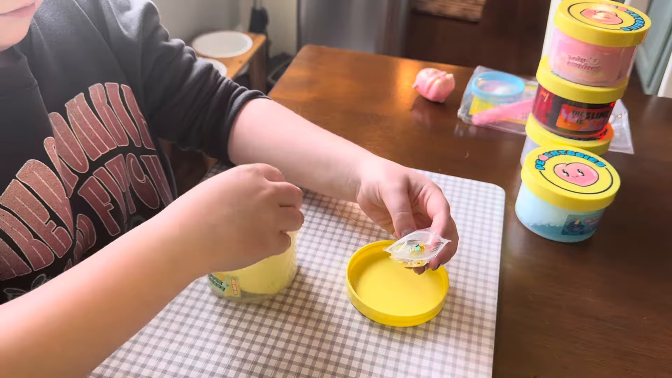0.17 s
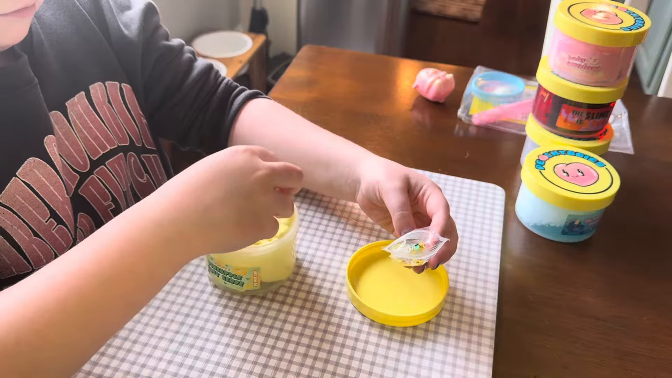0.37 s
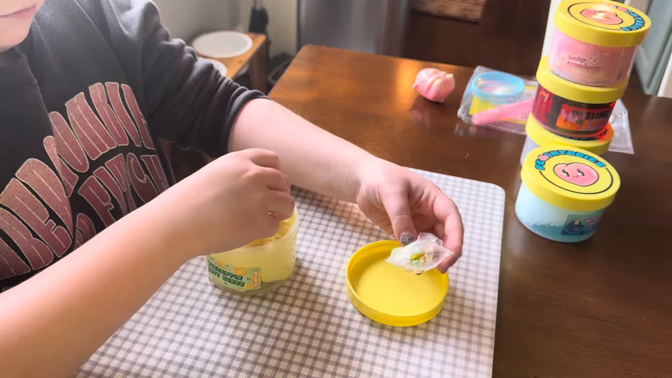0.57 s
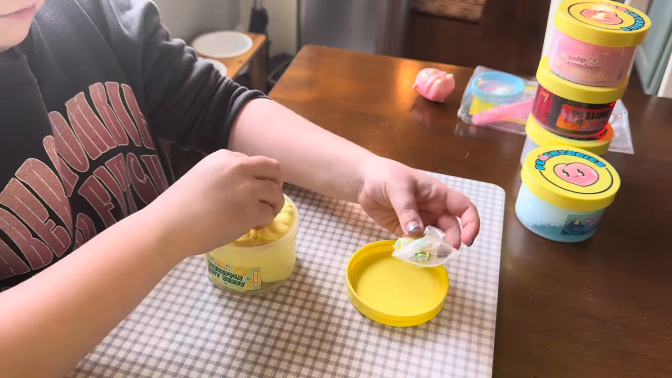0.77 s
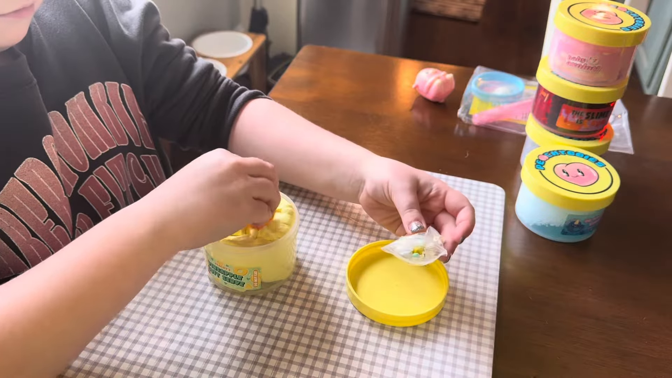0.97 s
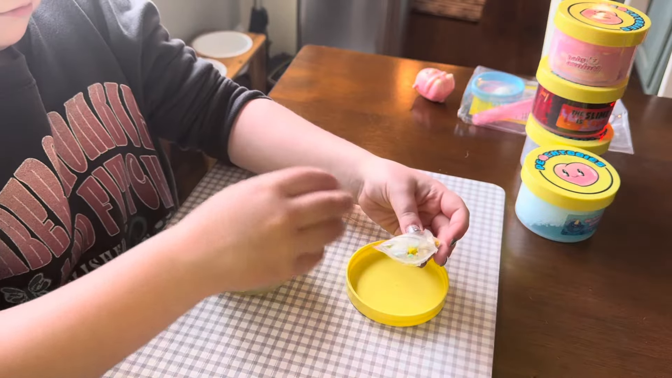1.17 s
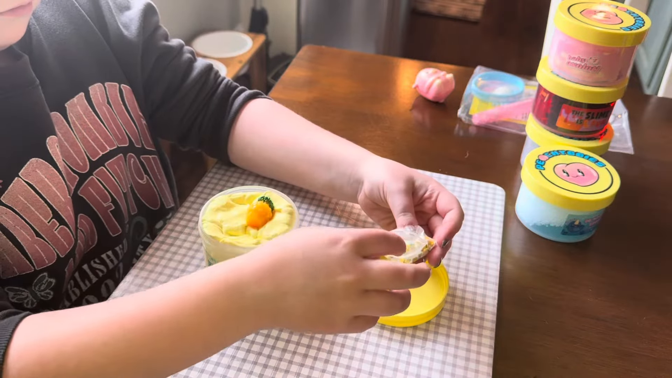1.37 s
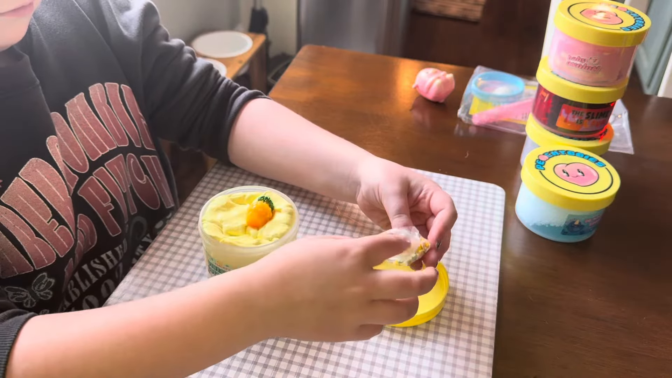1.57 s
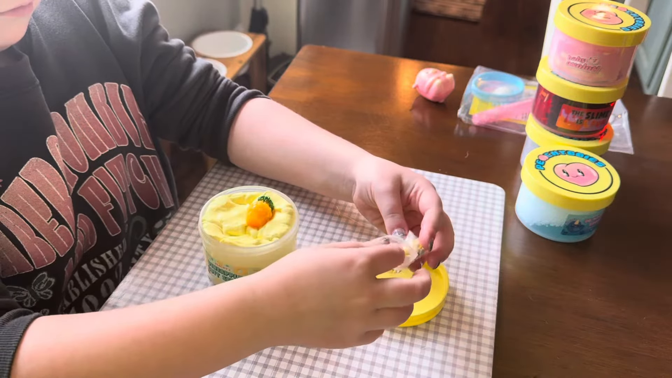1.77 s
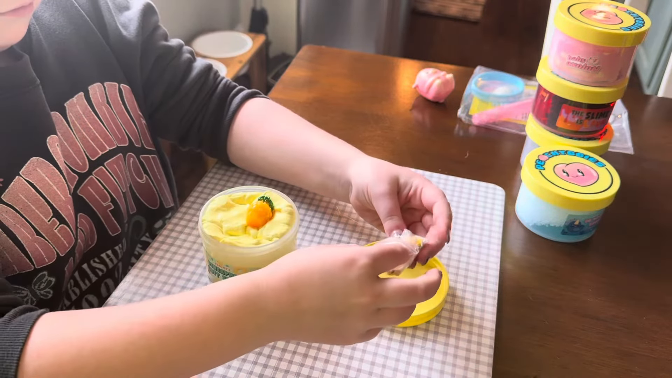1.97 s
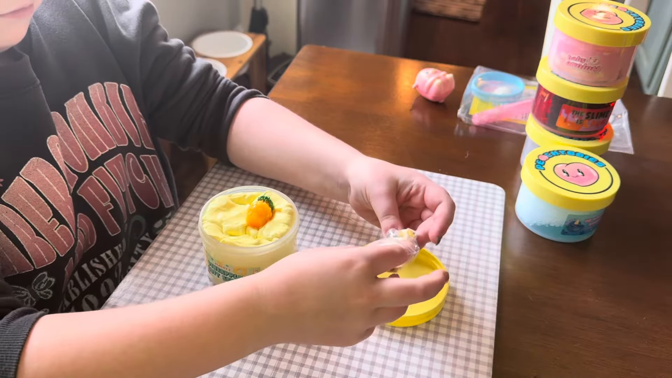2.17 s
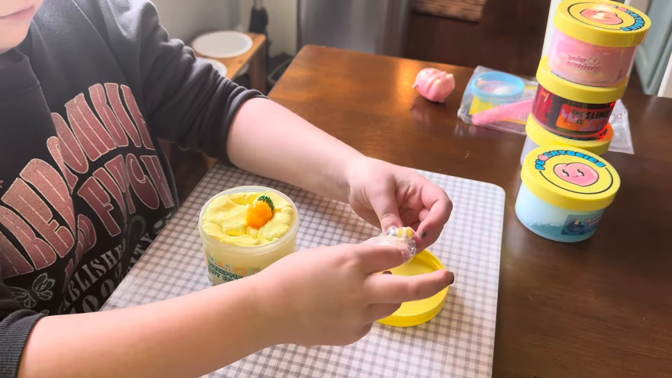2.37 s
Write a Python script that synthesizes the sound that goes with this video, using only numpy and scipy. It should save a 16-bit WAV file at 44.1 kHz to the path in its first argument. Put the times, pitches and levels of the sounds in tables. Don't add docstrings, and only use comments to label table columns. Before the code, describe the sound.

Close-up crackling of a small plastic bag, sparse at first and then dense, preceded by a quick knocking bounce of a trinket on wood; faint hiss, low hum and dull footfalls in a quiet room.

```python
import sys
import numpy as np
from scipy import signal
from scipy.fft import rfft, irfft
from scipy.io import wavfile
from scipy.ndimage import uniform_filter1d

SR = 44100
rng = np.random.default_rng(int(sys.argv[2]) if len(sys.argv) > 2 else 0)


def ratio(d):
    e = np.asarray(d, float) / 20
    return 10 ** e


def unload_wav(signal):
    wavfile.write(
        sys.argv[1],
        SR,
        np.round(np.clip(np.atleast_2d(signal).T, -1, 1) * 32767).astype(np.int16),
    )


N = 110250

# (pitch [Hz], level [dB])
AIR_TONE = [(28, -23), (55, -9), (140, -1.5), (270, -4), (516, -9), (863, -22), (3700, -41), (9000, -42.5),
            (16000, -66)]
# (pitch [Hz], likeness [1 = same])
LIKENESS = [(60, .99), (300, .75), (800, .15), (5500, .15), (7500, .88), (9500, .98), (16000, .98)]
# (pitch [Hz], time [s])
ECHO_T60 = [(60, 0.57), (250, 0.18), (1000, 0.64), (3000, 0.46), (7000, 0.44), (14000, 0.1)]

# (time [s], level [dB], floor pitch [Hz], air puff level [dB], floor ring t60 [s])
STEPS = [(0.231, -46, 63, -88, 0.23), (0.298, -31.5, 55, -43, 0.24), (0.431, -41.5, 71, -55, 0.25),
         (0.8698, -44.5, 71.6, -47, 0.17), (.893, -30.5, 63.6, -57, .16), (0.946, -51.5, 67, -54, .1),
         (.969, -36, 62.3, -56, 0.13), (0.985, -40.5, 64, -65.5, 0.048), (1.069, -63, 66, -67, 0.11),
         (1.33, -54, 50, -80, 0.086), (1.376, -45, 61, -61.5, 0.19), (1.424, -47, 58, -78, 0.34),
         (1.502, -44.5, 67.8, -65, .2), (1.548, -50, 62.7, -59, 0.25), (1.909, -51.5, 56.5, -75, 0.13),
         (2.014, -62, 63.6, -48.5, .1), (2.026, -41.5, 64.5, -50, 0.19), (2.036, -47, 220, -57, 0.073),
         (2.058, -49, 271, -79, 0.19), (2.08, -42.5, 62, -71, .1), (2.099, -45.5, 61, -75, 0.26),
         (2.49, -66, 62, -47.5, 0.22)]
# (pitch [Hz], level [dB per Hz])
PUFF_TONE = [(120, -31), (180, -0.5), (360, -8.5), (750, -14.5), (1100, -23), (2800, -26), (5000, -35),
             (6500, -52)]

# (time [s], knock [dB], table thump [dB], bright tick [dB], deepest table note [dB])
BOUNCES = [
    (0.2088, -20.5, -14.5, -24, 4),
    (0.253, -22, -18, -53, -9),
    (0.2874, -23.5, -22, -44.5, -18),
    (0.3178, -26, -20, -55, -30),
    (.340, -29.5, -21.5, -41.5, -19),
    (0.3575, -32.5, -28, -57, 0),
]
# (pitch [Hz], level [dB], t60 [s])
TABLE_NOTES = [(129.7, -3.5, 0.25), (209, -5, 0.048), (279, 5, 0.033), (348, -8, 0.05), (400, -13, 0.036),
               (557, -17.5, 0.08), (691, -11.5, 0.057), (812, -7.5, 0.031), (953, -16, 0.071),
               (1350, -3.5, 0.029), (1558, -10, 0.052), (2180, -14, 0.05), (2400, -9, 0.022)]
# (pitch [Hz], level [dB per Hz])
KNOCK_TONE = [(180, -27), (320, -5), (900, 1.5), (1700, -10), (2800, -10), (4300, -18.5), (7700, -28),
              (16000, -38)]

# (time [s], pitch [Hz], level [dB])
SQUEAK = [
    (.5, 3940, -95),
    (0.551, 3900, -81),
    (0.622, 3790, -74),
    (0.722, 3850, -78),
    (.78, 3630, -78),
    (.84, 3470, -82),
    (.9, 3450, -88),
]

# (time [s], peak [dB], low part [dB], low part pitch [Hz])
SNAPS = [(0.4532, -49.5, 3.5, 6000), (0.781, -62.5, 3, 3900), (1.1014, -29, -11, 4000),
         (1.4214, -55, -35, 1230), (1.4476, -57, -1, 2070), (1.493, -58.5, -24, 1150),
         (1.5559, -40, -1, 3900), (1.5608, -20.5, -17, 3850), (1.5684, -26.5, -2.5, 4120),
         (1.5852, -38.5, -4.5, 2000), (1.5968, -41, -2, 1250), (1.6344, -28.5, -8, 1110),
         (1.741, -30.5, -9, 2980)]
# (time [s], peak [dB], low part [dB], low part pitch [Hz])
CRINKLES = [(1.9198, -42, -1, 1120), (1.9325, -42, -7, 2510), (1.9419, -36.5, -18, 2640),
            (1.9605, -25, -24, 694), (1.9712, -39.5, -2, 2620), (1.9838, -28, -18, 910),
            (1.991, -47.5, 3, 940), (2.03, -32.5, -4, 1840), (2.0444, -42.5, -33, 745),
            (2.1212, -36.5, -4.5, 2860), (2.165, -49.5, -4, 2530), (2.1935, -35, -44, 800),
            (2.3335, -53.5, 10.5, 2320), (2.3722, -59.5, 0, 2450), (2.378, -41.5, 3.5, 2450),
            (2.3862, -50, 9.5, 2710), (2.3994, -45, 6, 970), (2.4346, -28.5, -19.5, 2680),
            (2.4793, -56, 9, 3580), (2.4934, -49, 4, 850)]
# (time [s], peak [dB], low part [dB], low part pitch [Hz])
MORE_CRACKLES = [(.548, -57, 0, 4100), (.661, -70.5, 7, 3850), (1.3236, -56, -17, 2000), (1.611, -40, -8, 1500),
                 (1.7108, -51, 5, 1480), (1.8261, -59, -4, 900), (1.8544, -47, -5, 1490), (1.87, -39, -18, 2500),
                 (1.873, -50, -4, 2500), (1.886, -39, -13, 2500), (1.891, -59.5, 5, 2000), (1.898, -52.5, 1, 2500),
                 (1.9229, -37, -6.5, 2600), (1.9368, -52, 11, 2720), (2.0385, -50, 6.5, 2400),
                 (2.171, -54, -20, 2500), (2.178, -61.5, 10, 2500), (0.158, -40, -8, 3700), (2.358, -49, -20, 2500),
                 (2.3159, -59, 5, 2400), (2.343, -66, 14, 2550)]
SHEEN_DB = [-21, -9, -4, 5, 3, 0.1, 3, 5, -4, 4, 13.5, -5, 1, 1, -1, 2, -2, 2, 7, -1, 9.5, 10, 6, 11.5, 5,
            -1, -1, 0, -15, -14, 4.5, -3, 4]
# (pitch [Hz], level [dB per Hz])
FILM_TONE = [(880, -36), (1500, -17.5), (3000, -32.5), (4000, -12), (5500, -23.5), (7600, -5.5),
             (11500, -11.5), (16000, -8.5)]
# (pitch [Hz], level [dB per Hz])
SEND_TONE = [(1500, -14), (3500, 0), (6000, -2.5), (8500, -1.5), (13000, 3)]
# (middle [s], half length [s], level [dB])
RUSTLE = [(0.142, 0.03, -68), (0.16, 0.014, -53.5), (0.26, 0.19, -70.5), (0.541, 0.063, -65),
          (0.662, 0.04, -73), (0.767, 0.1, -74.5), (1.152, 0.18, -78), (1.325, 0.053, -73),
          (1.409, 0.059, -73.5), (1.518, 0.047, -64), (1.603, 0.054, -57.5), (1.723, 0.14, -60.5),
          (1.882, 0.051, -58), (1.975, 0.043, -53), (2.03, 0.3, -72), (2.15, 0.17, -68), (2.335, 0.13, -71),
          (2.397, 0.03, -53.5)]
# (pitch [Hz], level [dB per Hz])
RUSTLE_TONE = [(400, -24.5), (700, -0.5), (1300, -3), (3700, -3.5), (5500, -11), (8500, -5.5),
               (12300, -8.5), (16000, -5)]

# (pitch [Hz], left ahead by [radians])
PORT_PHASE = [(1500, 0), (4200, -2), (5400, -1.5), (7300, 0), (9600, 3.14), (12200, 6.28), (15800, 9.42),
              (17000, 11)]
# (pitch [Hz], left minus right [dB])
PORT_LEVEL = [(100, -.8), (1500, -1.5), (5500, -4.5), (8000, 0)]


def evened(x):
    return x / np.sqrt(np.mean(x ** 2) + 1e-20)


def read(points, hz):
    f, value = np.transpose(points)
    return np.interp(np.log(hz + 1), np.log(f + 1), value)


def add(mix, s, sound):
    part = mix[round(s * SR):][:len(sound)]
    part += sound[:len(part)]


def alike(same, a, b):
    return same * a + np.sqrt(1 - same ** 2) * b


def colour(x, points):
    hz = abs(np.fft.fftfreq(4096, 1 / SR))
    log_gain = np.log(ratio(np.maximum(read(points, hz), -70)))
    taps = np.fft.ifft(np.exp(log_gain - 1j * signal.hilbert(log_gain).imag)).real
    if abs(taps[-400:]).sum() > abs(taps[:400]).sum():
        taps = np.roll(taps[::-1], 1)
    taps = taps[:2048]
    return signal.oaconvolve(x, taps / np.linalg.norm(taps))[:len(x)]


def burst(rise_s, t60, noise):
    t = np.arange(len(noise)) / SR
    fall = ratio(-60 * np.maximum(t - rise_s, 0) / t60)
    return noise * np.minimum(t / rise_s, 1) ** 2 * fall


def room(x):
    dull_db_per_khz = -0.2
    echoes = rng.choice([-1., 1.], (2, SR)) * (rng.random((2, SR)) < 0.4)
    echoes[:, :round(0.004 * SR)] = 0
    hz, t, z = signal.stft(echoes, SR, nperseg=256)
    hz = hz[:, None]
    z = np.array([z[0], alike(read(LIKENESS, hz), z[0], z[1])])
    fade = ratio(-60 * t / read(ECHO_T60, hz) + dull_db_per_khz * hz / 1000)
    tail = signal.istft(z * fade, SR, nperseg=256)[1]
    return signal.fftconvolve(x[None], tail / np.linalg.norm(tail[0]), axes=1)[:, :N]


def air():
    air_db, patch_db, hum_hz, hum_db = -60, 0.31, 513, -71
    frames, hz = N // 256 + 5, np.fft.rfftfreq(1024, 1 / SR)[:, None]
    a, b, c, d, patches = rng.standard_normal((frames, 513, 5)).T
    patches = uniform_filter1d(patches, size=8, axis=0)
    patches = evened(uniform_filter1d(patches, size=14, axis=1))
    left = a + 1j * b
    z = np.array([left, alike(read(LIKENESS, hz), left, c + 1j * d)])
    z *= ratio(read(AIR_TONE, hz) + patch_db * patches)
    hiss = signal.istft(z, nperseg=1024, noverlap=768)[1][:, :N]
    hum = np.sin(2 * np.pi * hum_hz * np.arange(N) / SR)
    return ratio(air_db) * evened(hiss) + ratio(hum_db) * hum


def steps():
    rise_s = 0.0087
    floor, puff, t = np.zeros(N), np.zeros(N), np.arange(SR // 4) / SR
    noises = rng.standard_normal((len(STEPS), SR // 4))
    for (s, db, hz, puff_db, t60), noise in zip(STEPS, noises):
        wave = np.cos(2 * np.pi * hz * (t - rise_s))
        add(floor, s, ratio(db) * burst(rise_s, t60, wave))
        add(puff, s, ratio(puff_db) * burst(0.0057, 0.063, noise))
    return floor, colour(puff, PUFF_TONE)


def table_ring():
    t, sides = np.arange(SR // 2) / SR, np.array([[1], [-1]])
    ring = []
    for k, (hz, db, t60) in enumerate(TABLE_NOTES):
        skew = sides * (-1) ** k * min((hz / 800) ** 2, 1.2)
        ring.append(ratio(db - 60 * t / t60) * np.sin(2 * np.pi * hz * t + skew))
    return np.array(ring) * np.minimum(t / 0.0021, 1)


def trinket():
    table_db, knock_same = -8, 0.88
    spot_db = 4.5
    tick, knock, push = np.zeros(N), np.zeros((2, N)), np.zeros((len(TABLE_NOTES), N))
    noises = rng.standard_normal((len(BOUNCES), 3, 800))
    for (s, db, thump_db, tick_db, deep_db), noise in zip(BOUNCES, noises):
        right = alike(knock_same, noise[0], noise[2])
        add(knock[0], s, ratio(db) * burst(0.0011, 0.021, noise[0]))
        add(knock[1], s, ratio(db) * burst(0.0005, 0.013, right))
        add(tick, s, ratio(tick_db) * burst(0.0021, 0.0063, noise[1]))
        note_db = np.r_[deep_db, spot_db * noise[1, 1 - len(TABLE_NOTES):]]
        push[:, round((s + 0.005) * SR)] = ratio(thump_db + note_db)
    thump = signal.fftconvolve(push[:, None], table_ring(), axes=2).sum(0)[:, :N]
    knock = np.array([colour(k, KNOCK_TONE) for k in knock])
    return knock + colour(tick, FILM_TONE) + ratio(table_db) * thump


def squeak():
    width_hz = 530
    s, hz, db = np.transpose(SQUEAK)
    t, r = np.arange(N) / SR, np.exp(-np.pi * width_hz / SR)
    noise = rng.standard_normal(N) + 1j * rng.standard_normal(N)
    fuzz = signal.lfilter([1], [1, -2 * r, r * r], noise)
    turns = np.cumsum(np.interp(t, s, hz)) / SR
    tone = (fuzz * np.exp(2j * np.pi * turns)).real
    return ratio(np.interp(t, s, db, -140, -140)) * evened(tone)


def rustle():
    grains_per_s, t, level = 2300, np.arange(N) / SR, np.zeros(N)
    for s, half_s, db in RUSTLE:
        level += ratio(db) * np.exp(-2 * ((t - s) / half_s) ** 2)
    grains = rng.standard_normal(N) * (rng.random(N) < grains_per_s / SR)
    grains *= ratio(0.93 * np.minimum(rng.exponential(1, N), 3))
    grains = evened(grains) + rng.standard_normal(N)
    return level * evened(colour(grains, RUSTLE_TONE))


def bag():
    sheen_hz, low_db_all, spread = 10000, -1.5, 1.16
    crack, low, send = np.zeros((2, N)), np.zeros(N), np.zeros(N)
    rows = list(SNAPS) + list(CRINKLES) + list(MORE_CRACKLES)
    sheens = list(SHEEN_DB) + [0] * len(MORE_CRACKLES)
    treble = signal.butter(3, sheen_hz, "high", fs=SR)
    noises = rng.standard_normal((len(rows), 2, 900))
    for (s, db, low_db, hz), sheen_db, noise in zip(rows, sheens, noises):
        snap = ratio(db) * burst(0.0006, 0.0045, noise[0])
        snap = snap + (ratio(sheen_db) - 1) * signal.filtfilt(*treble, snap)
        add(send, s, np.linalg.norm(snap, keepdims=True))
        side = int(np.sign(noise[0, -1]))
        add(crack[0], s, snap)
        add(crack[1], s, 0.85 * snap + 0.4 * np.roll(snap, side))
        band = signal.butter(1, [hz / spread, hz * spread], "band", fs=SR)
        body = evened(signal.lfilter(*band, noise[1]))
        add(low, s + 0.0008, ratio(db + low_db + low_db_all) * burst(0.0007, 0.0079, body))
    near = low + rustle()
    return np.array([colour(c, FILM_TONE) for c in crack]) + near, colour(send, SEND_TONE) + near


def scene():
    drop, (film, send), (floor, puff) = trinket(), bag(), steps()
    to_room = ratio(-8) * drop[0] + ratio(-8.5) * send + ratio(4) * puff + ratio(-9.5) * floor
    return drop + film + floor + ratio(4) * puff + room(to_room) + air() + squeak()


def top_cut(x):
    return signal.sosfilt(signal.butter(12, 17660, fs=SR, output="sos"), x)


def record(dry):
    top_hz, dwell = 15800, 0.2
    hz = np.fft.rfftfreq(N, 1 / SR)
    gap = read(PORT_PHASE, hz)
    gap = gap - dwell * np.sin(2 * gap)
    half = ratio(read(PORT_LEVEL, hz) / 2) * np.exp(0.5j * gap)
    edge = ratio(-60 * np.clip((hz - top_hz) / 1700, 0, 1))
    mix = irfft(rfft(dry) * edge * np.array([half, 1 / half]), N)
    return top_cut(mix)


dry = scene()
out = record(dry)
unload_wav(out)
```